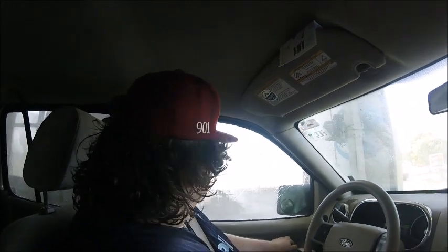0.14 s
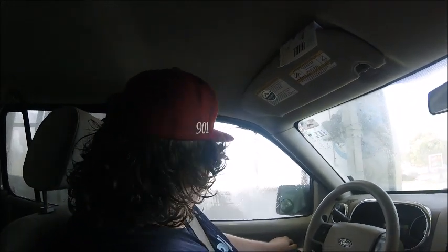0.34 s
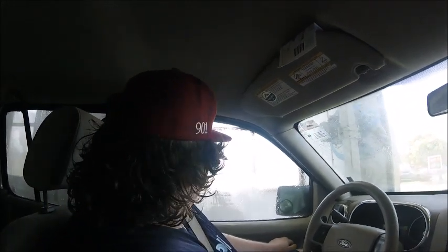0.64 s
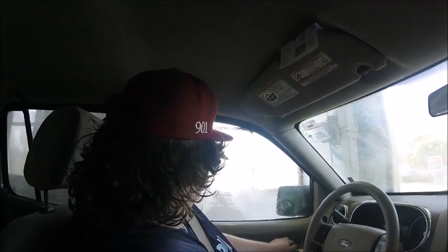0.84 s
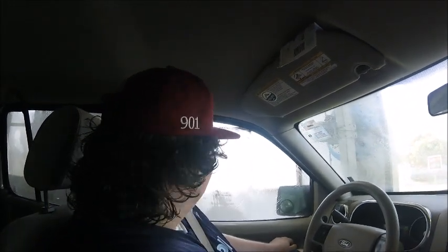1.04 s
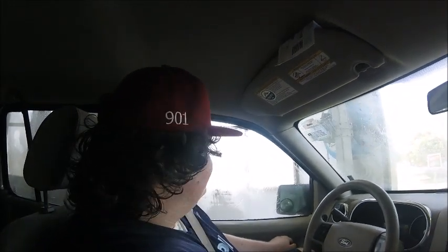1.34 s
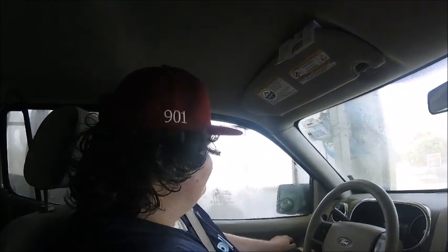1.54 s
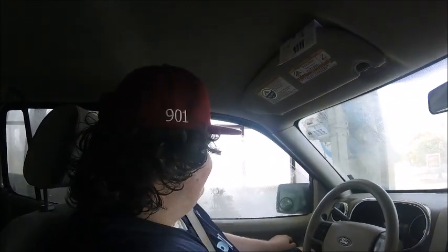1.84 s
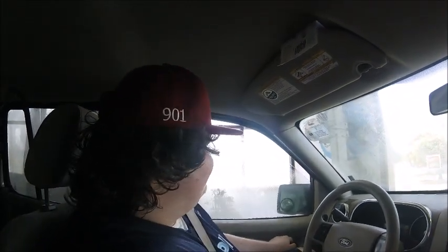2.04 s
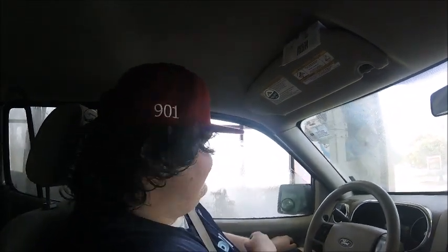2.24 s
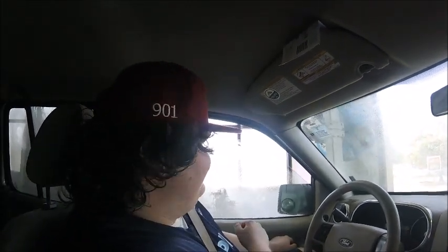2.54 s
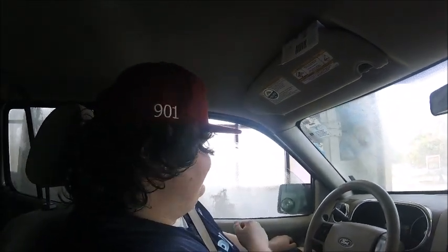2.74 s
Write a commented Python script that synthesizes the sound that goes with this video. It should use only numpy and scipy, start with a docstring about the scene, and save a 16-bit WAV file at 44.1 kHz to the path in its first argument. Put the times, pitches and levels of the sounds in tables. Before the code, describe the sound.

Automatic car wash rumbling and drumming steadily, heard from inside the closed car.

```python
"""Inside an automatic car wash

Buffeting makes the closed cabin boom and the doors rumble. Brushes drum and slap the car and water
beats on its panels, each part ringing at its own resonances, over a faint hum of motors.
A dense spray reaches the windows after about half a second, eases, and surges once more."""
import sys
import numpy as np
from scipy import signal
from scipy.fft import rfft, irfft
from scipy.io import wavfile
from scipy.ndimage import uniform_filter1d

SR = 44100
rng = np.random.default_rng(int(sys.argv[2]) if len(sys.argv) > 2 else 0)


def inscribe(sig):
    """Save sig as 16-bit PCM at rate SR to the path in sys.argv[1].

    A 1-D sig is mono; a 2-D sig holds one channel per row.
    Samples are clipped to [-1, 1] before scaling.
    """
    pcm = np.round(np.clip(np.atleast_2d(sig).T, -1, 1) * 32767)
    wavfile.write(sys.argv[1], SR, pcm.astype(np.int16))


N = 127890


def undb(db):
    """Amplitude ratio of a level in decibels."""
    return 10 ** (np.asarray(db) / 20)


def unit(x):
    """Normalisation to rms 1."""
    return x / np.sqrt(np.mean(x ** 2))


def envelope(table, column=1):
    """Amplitude envelope, interpolated in decibels between the times of a table."""
    rows = np.array(table)
    return undb(np.interp(np.arange(N) / SR, rows[:, 0], rows[:, column]))


def waver(bandwidth_hz):
    """Slow random modulation: low-passed noise of rms 1."""
    hz = np.arange(N // 2 + 1) * SR / N
    lowpass = np.exp(-(hz / bandwidth_hz) ** 2) * (hz > 0)
    return unit(irfft(rfft(rng.standard_normal(N)) * lowpass, N))


def ring(force, response):
    """Forced vibration: a body filters the force by its frequency response; the result has rms 1."""
    rows = np.array(response)
    hz = np.maximum(np.arange(N // 2 + 1) * SR / N, 1)
    gain = undb(np.interp(np.log(hz), np.log(rows[:, 0]), rows[:, 1]))
    gain *= np.minimum(hz / rows[0, 0], 1) ** 2 * np.minimum(rows[-1, 0] / hz, 1) ** 4
    # folding the cepstrum gives minimum phase, so the ringing follows each blow
    cepstrum = irfft(np.log(gain), N)
    fold = 1 + np.sign(N / 2 - np.arange(N))
    fold[0] = 1
    return unit(irfft(rfft(force) * np.exp(rfft(cepstrum * fold)), N))


def impacts(per_s, scatter_db):
    """Shot noise: randomly timed impulses of log-normal strength."""
    hit = rng.random(N) < per_s / SR
    polarity = np.sign(rng.standard_normal(N))
    return unit(hit * polarity * undb(scatter_db * rng.standard_normal(N)))


def steady(x, span_s, share):
    """Compression: dividing by a power of the running rms evens out chance swells."""
    size = int(span_s * SR)
    power = uniform_filter1d(uniform_filter1d(x ** 2, size), size)
    return unit(x / (power + 1e-9) ** (share / 2))


def swells(table, rise_s):
    """Envelope of critically damped pulses, each peaking rise_s after its onset."""
    t = np.arange(N) / SR
    ages = [(np.maximum(t - onset, 0) / rise_s, db) for onset, db in table]
    return sum(undb(db) * age * np.exp(1 - age) for age, db in ages)


def blows(table, modes, rise_s):
    """Damped free vibration: each soft blow excites a body's modes, which decay exponentially."""
    out = np.zeros(N)
    for onset, db, decay_s in table:
        age = np.maximum(np.arange(N) / SR - onset, 0)
        tone = sum(undb(mode_db) * np.sin(2 * np.pi * hz * age) for hz, mode_db in modes)
        out += undb(db) * tone * (1 - np.exp(-age / rise_s)) * np.exp(-age / decay_s)
    return out


def motors(gain_db=-3.5, throb_db=3.5, wander=0.002):
    """The motors outside hum and whine in tones with random amplitude and frequency modulation."""
    # f/Hz, relative level/dB
    tones = [(258, -36.5), (493, -55.5), (1543, -61.5), (1775, -61.5)]
    hum = np.zeros(N)
    for hz, db in tones:
        amplitude = np.sqrt(2) * undb(db + gain_db + throb_db * waver(4.6))
        frequency = hz * (1 + wander * waver(15))
        hum += amplitude * np.sin(2 * np.pi * np.cumsum(frequency) / SR)
    return hum


def spray(sputter_db=0.54):
    """Drop impacts on the glass make three bands of shot noise, modulated together by the jet's sputter."""
    # spray on the windows: t/s, patter level/dB, hiss level/dB, mist level/dB
    levels = [(0, -50, -54.5, -62.5), (.42, -48, -53.5, -60.5), (.475, -42.5, -50, -53),
              (.655, -40, -50.5, -53), (.69, -43, -51.5, -56), (.95, -42.5, -50.5, -54),
              (1.12, -43, -51, -55.5), (1.26, -44.5, -53, -56.5), (1.41, -43, -51.5, -54.5),
              (1.5, -45.5, -53.5, -57), (1.61, -42, -53, -56), (1.76, -43.5, -54, -56),
              (1.815, -43.5, -49, -53.5), (1.897, -39, -50, -53), (1.91, -45, -52, -57),
              (2.1, -46, -52, -56.5), (2.3, -45, -51, -54), (2.5, -46, -51.5, -56.5),
              (2.68, -45, -50.5, -56), (2.9, -45, -50.5, -55)]
    # spectra of the three bands: f/Hz, relative level/dB
    patter_spectrum = [(750, -18), (1030, -1), (1350, -1), (1750, -3), (2000, -1.9), (2300, -6), (2600, -9),
                       (3200, -29.5)]
    hiss_spectrum = [(2100, -20.5), (2700, -1), (3150, 2.5), (3450, 0), (3950, 0), (4400, -3.5),
                     (4800, -11.5), (5600, -29.5)]
    mist_spectrum = [(4000, -21.5), (4800, -2), (5300, -3.5), (5900, -5.5), (6400, 2.5), (6650, 0),
                     (6950, -9), (7500, -12.5), (8400, -16), (9100, -20.5), (10200, -28), (11200, -22.5),
                     (13000, -35)]
    patter = ring(impacts(per_s=5000, scatter_db=2.0), patter_spectrum) * envelope(levels)
    hiss = ring(impacts(per_s=6000, scatter_db=1.0), hiss_spectrum) * envelope(levels, column=2)
    mist = ring(impacts(per_s=6000, scatter_db=2.5), mist_spectrum) * envelope(levels, column=3)
    return (patter + hiss + mist) * undb(sputter_db * waver(40))


def wash():
    """Impact excitation: heavy splashes drive two ranges of resonances in the body panels."""
    # water on the panels: t/s, low range level/dB, high range level/dB
    levels = [(0.0, -62, -29), (0.01, -38.5, -42.5), (0.28, -38.5, -43), (0.65, -31, -39.5),
              (0.68, -35.5, -40.5), (1.13, -33, -39.5), (1.24, -37, -42), (1.95, -36, -44.5),
              (2.01, -39, -44.5), (2.25, -38.5, -43), (2.64, -44, -45.5), (2.7, -33.5, -44),
              (2.76, -41.5, -44), (2.87, -36.5, -43.5)]
    # panel responses: f/Hz, relative level/dB
    low_response = [(290, -15.5), (360, -1.5), (385, -1.5), (420, -0.5), (465, -1), (492, 2), (515, -3.5),
                    (550, -4), (590, -26.5), (680, -30.5)]
    high_response = [(520, -30), (600, 0.5), (642, -3), (661, 3), (682, -1.5), (745, 0), (778, 1),
                     (815, -3.5), (1020, -9.5), (1300, -33.5)]
    low = steady(ring(impacts(per_s=4500, scatter_db=2.0), low_response), span_s=0.23, share=0.37)
    high = steady(ring(impacts(per_s=4500, scatter_db=4.0), high_response), span_s=0.059, share=0.23)
    return low * envelope(levels) + high * envelope(levels, column=2)


def roof_drumming():
    """Plate resonance: dense, soft brush strokes on the roof merge into a continuous drumming."""
    # drumming: t/s, level/dB
    levels = [(0, -28.5), (.15, -31), (.33, -30.5), (.55, -29.5), (.8, -30.5), (1.1, -33), (1.35, -30),
              (1.6, -35), (1.78, -30.5), (1.9, -29.5), (2.02, -33), (2.1, -28.5), (2.3, -28.5), (2.5, -28),
              (2.7, -27), (2.8, -33), (2.9, -23.5)]
    # roof response: f/Hz, relative level/dB
    response = [(150, -31.5), (190, -4.5), (235, -0.5), (250, -2), (259, -1.5), (274, -7.5), (298, -11),
                (325, -5.5), (355, -15.5), (410, -34.5)]
    drum = ring(impacts(per_s=1200, scatter_db=3), response)
    return steady(drum, span_s=0.19, share=0.56) * envelope(levels)


def brushes():
    """Impact transients: after a faint midrange burst, wet cloth thumps the roof, slaps the side
    and flings drops at the glass."""
    # thumps on the roof: t/s, relative level/dB, decay time/s
    thumps = [(.156, -14.5, 0.041), (.29, -15, 0.02), (.775, -22, 0.055), (1.84, -18.5, 0.021),
              (2.2, -13.5, 0.028), (2.277, -14, 0.0093), (2.345, -14, 0.02), (2.376, -18, 0.01),
              (2.566, -16, 0.011), (2.607, -16.5, 0.014), (2.69, -18, 0.054), (2.74, -20, .022)]
    # roof modes: f/Hz, relative level/dB
    roof_modes = [(165, -11.5), (228, -3), (258, -2), (322, -13.5)]
    # a brief, faint midrange burst at the start, then wet slaps: t/s, level/dB
    bursts = [(.047, -41), (.312, -37), (.487, -38), (.59, -41), (1.082, -39), (1.152, -38), (1.362, -44),
              (1.814, -32.5), (1.882, -42), (2.675, -40)]
    # flurries of drops: t/s, level/dB
    flurries = [(.5, -62), (.648, -60), (2.41, -67), (2.445, -70)]
    # spectra of both: f/Hz, relative level/dB
    burst_spectrum = [(400, -9.5), (620, 8), (780, 0), (1150, -2.5), (1700, -12), (3000, -23), (5000, -30)]
    flurry_spectrum = [(3500, -4), (6500, 1), (9500, -2), (13000, -18)]
    thumping = blows(thumps, roof_modes, rise_s=0.0026)
    midrange = steady(ring(rng.standard_normal(N), burst_spectrum), span_s=0.014, share=0.62)
    drops = ring(impacts(per_s=5000, scatter_db=0), flurry_spectrum)
    return thumping + midrange * swells(bursts, rise_s=0.0046) + drops * swells(flurries, rise_s=0.008)


def buffeting():
    """Cavity and panel resonance: turbulence and a few heavy buffets excite the cabin air and the doors."""
    # cabin boom and door rumble: t/s, level/dB
    boom_levels = [(0.0, -42), (0.08, -32), (0.11, -28), (0.38, -19.5), (0.47, -22.5), (.8, -24),
                   (1.01, -24), (1.17, -27), (1.36, -25), (1.55, -22.5), (1.72, -25), (1.88, -23),
                   (2.3, -27), (2.55, -24), (2.81, -22), (2.87, -25)]
    door_levels = [(0, -31.5), (.15, -26), (.3, -29), (.6, -23.5), (.68, -26), (.78, -24.5), (.97, -22.5),
                   (1.25, -27.5), (1.42, -24), (1.55, -24), (1.73, -24.5), (1.9, -25), (2.15, -30),
                   (2.44, -24), (2.54, -26), (2.7, -24), (2.8, -28.5), (2.87, -23)]
    # cabin and door responses: f/Hz, relative level/dB
    cabin_response = [(12, -29), (22, -22), (31, -21), (38, 0.5), (44, 1), (50, -6), (58, -10.5), (72, -34)]
    door_response = [(50, -19.5), (68, 0.5), (84, -6), (98, -0.5), (114, -3.5), (127, 1), (150, -4),
                     (175, -10), (215, -25)]
    # buffets against the body: t/s, relative level/dB, decay time/s
    buffets = [(.403, -14, 0.028), (.978, -21, 0.034), (1.207, -15.5, 0.043), (1.747, -9.5, 0.03),
               (2.395, -22, 0.017), (2.44, -17, 0.042)]
    # cabin and door modes: f/Hz, relative level/dB
    modes = [(44, 3), (68, -11), (125, -15.5)]
    boom = steady(ring(rng.standard_normal(N), cabin_response), span_s=0.037, share=0.78)
    rumble = steady(ring(rng.standard_normal(N), door_response), span_s=0.091, share=1.0)
    thuds = blows(buffets, modes, rise_s=0.004)
    return boom * envelope(boom_levels) + rumble * envelope(door_levels) + thuds


def scene():
    """Superposition of all sources in the cabin, as one channel."""
    return (buffeting() + roof_drumming() + wash() + spray() + brushes() + motors())[None]


def record(dry, cutoff_hz=13500):
    """Band limiting: a steep elliptic low-pass removes the highest treble."""
    return signal.sosfilt(signal.ellip(8, .2, 70, cutoff_hz, fs=SR, output="sos"), dry)


dry = scene()
out = record(dry)
inscribe(out)
```